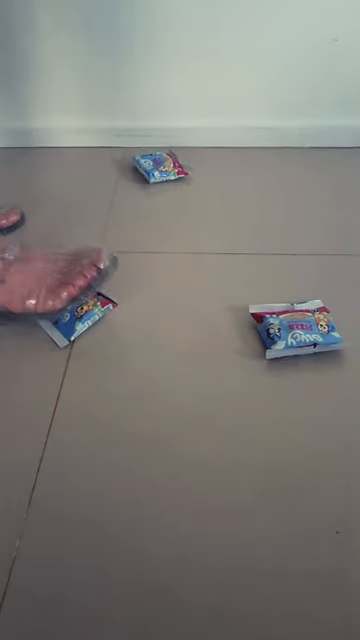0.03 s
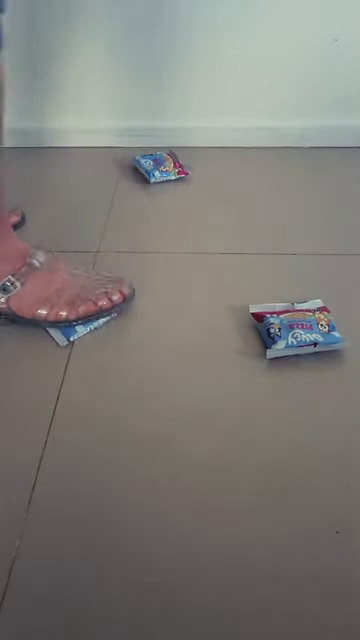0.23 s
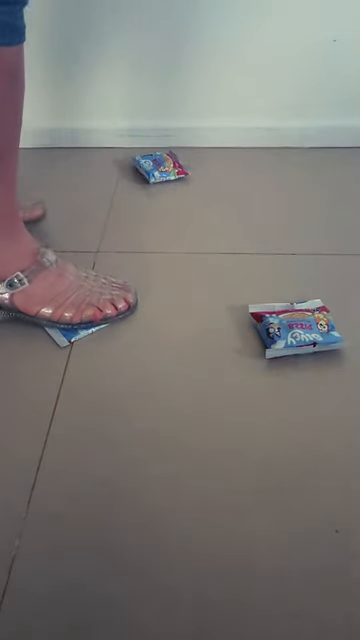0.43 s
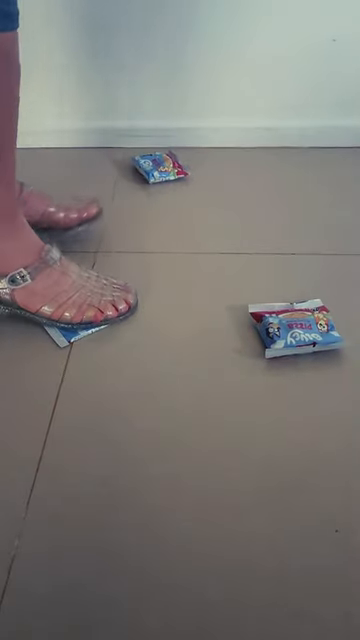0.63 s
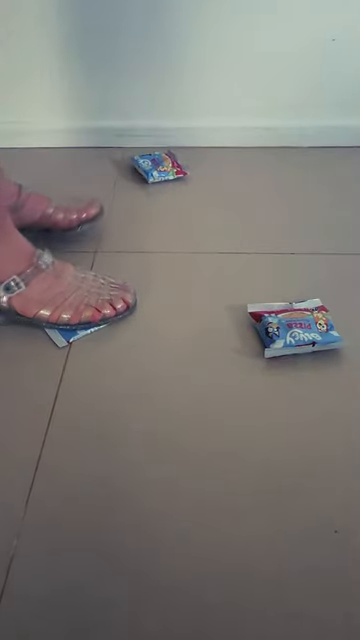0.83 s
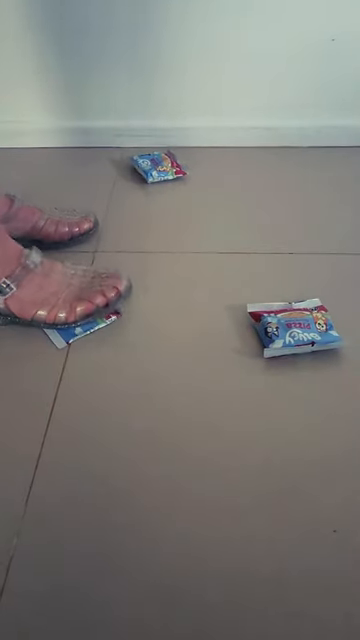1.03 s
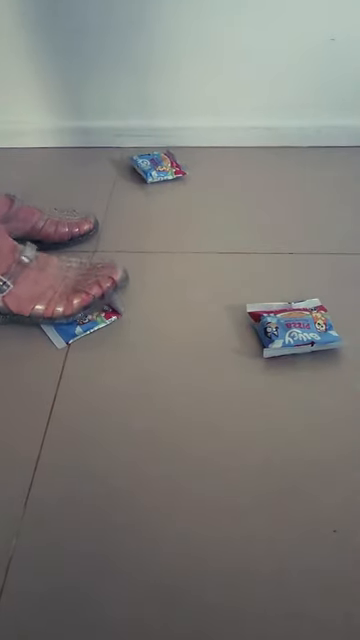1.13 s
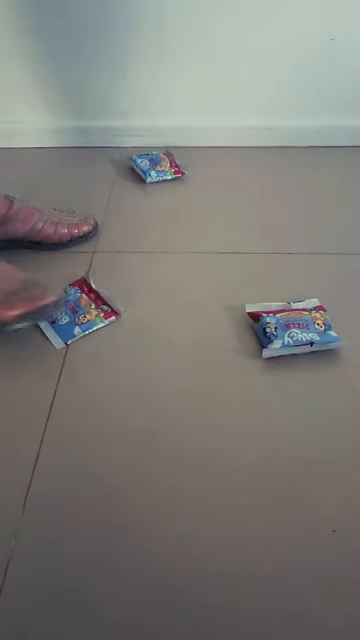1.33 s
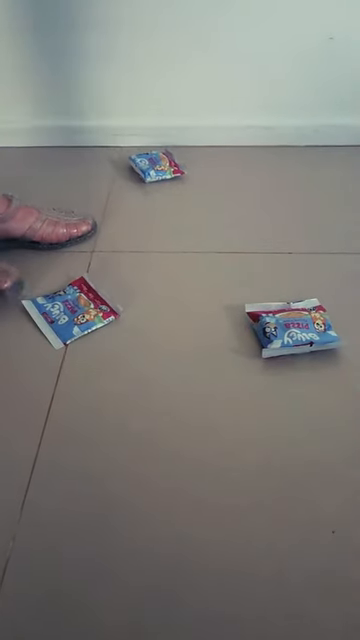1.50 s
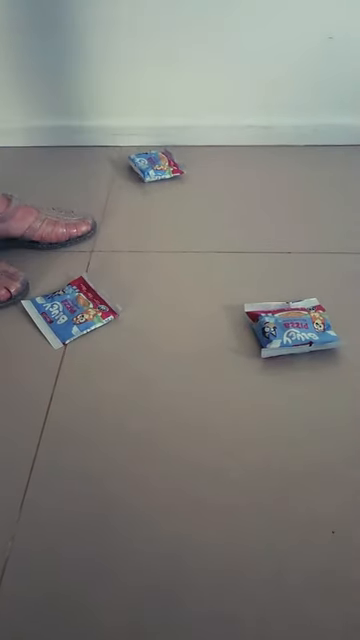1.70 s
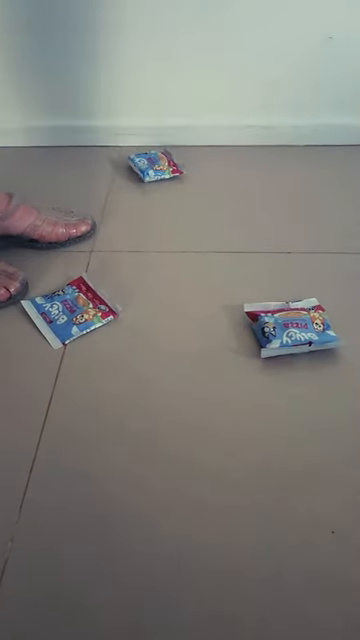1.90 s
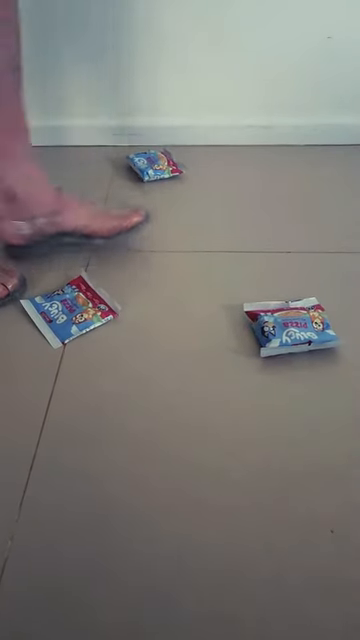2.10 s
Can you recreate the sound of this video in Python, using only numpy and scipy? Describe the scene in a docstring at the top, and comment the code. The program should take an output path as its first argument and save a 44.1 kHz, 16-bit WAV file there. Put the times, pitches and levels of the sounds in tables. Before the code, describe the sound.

A packet of crackers crunches loudly under a foot, then its wrapper crinkles and ticks.

```python
"""A bare, echoing room with a tiled floor. A sandalled foot stamps on a packet of crackers.
The bag crumples and the crackers snap and crumble as the sole thumps down; the room rings.
The foot lifts: crumbs shift, the bag pops dully, the sandal knocks once, and the wrapper crinkles and
springs back in single ticks. Then the sandal is set down lightly. Faint rumble and hiss lie underneath."""
import sys
import numpy as np
from scipy import signal
from scipy.fft import rfft, irfft
from scipy.io import wavfile

SR = 44100
rng = np.random.default_rng(int(sys.argv[2]) if len(sys.argv) > 2 else 0)


def master(y):
    """Save y as 16-bit WAV."""
    cut = np.clip(np.atleast_2d(y).T, -1, 1)
    pcm = np.round(cut * 32767)  # scale
    wavfile.write(sys.argv[1], SR, pcm.astype(np.int16))


N = 94815
T = np.arange(N) / SR
LANDING_S = 0.344

# wrapper creases flipping over, plus one bright cracker snap at 0.29 s: start_s, level_db, ring_hz
BRIGHT_TICKS = [(0.1729, -24.5, 4200), (0.2903, 1.5, 7500), (0.5368, -15.5, 9100), (0.6102, -15, 7440),
                (0.7582, -31.5, 7600), (0.8, -21, 4300), (.8182, -24, 8040), (.8930, -23, 7600),
                (0.911, -23, 7400), (0.9325, -9.5, 6760), (.9988, -13.5, 6000), (1.0588, -18.5, 5670),
                (1.1178, -20.5, 7500), (1.2679, -12.5, 7420), (1.2857, -23, 5600), (1.3305, -33.5, 8500),
                (1.4240, -16, 5980), (1.5794, -37, 4600), (1.8563, -46.5, 2170)]


def undb(db):
    """Decibels to gain."""
    return 10 ** (np.asarray(db) / 20)


def curve(rows):
    """Gain over time from (time_s, level_db) points."""
    return undb(np.interp(T, *np.array(rows).T, left=-120, right=-120))


def on_log(hz, points):
    """Interpolate (freq_hz, value) points on a log-frequency axis."""
    freq_hz, values = np.array(points).T
    return np.interp(np.log(hz + 1), np.log(freq_hz), values)


def unit(x):
    """Scale each channel to unit energy."""
    return x / np.sqrt(np.sum(x ** 2, axis=-1, keepdims=True))


def colour(x, points, size=4096):
    """Minimum-phase filter of unit energy through (freq_hz, gain_db) points."""
    gain = undb(on_log(np.fft.rfftfreq(size, 1 / SR), points))
    cepstrum = irfft(np.log(gain))
    cepstrum[1:size // 2] *= 2
    cepstrum[size // 2 + 1:] = 0
    impulse = unit(irfft(np.exp(rfft(cepstrum))))
    return signal.fftconvolve(x, impulse[None], axes=-1)[:, :x.shape[-1]]


def highpass(x, hz, order=2):
    """Butterworth low cut."""
    return signal.sosfilt(signal.butter(order, hz, "high", fs=SR, output="sos"), x)


def resonate(x, hz, width_hz):
    """One resonance, gain 1 at its centre."""
    return signal.lfilter(*signal.iirpeak(hz, hz / width_hz, fs=SR), x)


def stereo_noise(coherence, size):
    """Left and right noise with a common share."""
    noise = rng.standard_normal((3, size))
    return np.sqrt(coherence) * noise[0] + np.sqrt(1 - coherence) * noise[1:]


def pan(x, left_db):
    """Raise left over right by left_db."""
    return x * undb(np.array([[left_db], [-left_db]]) / 2)


def add(out, start_s, sound):
    """Mix a sound in at start_s."""
    i = int(start_s * SR)
    out[:, i:i + sound.shape[-1]] += sound[:, :N - i]


def crack(decay_ms, coherence, edge, size=3000):
    """A sharp release, then a quickly dying noise burst."""
    burst = unit(stereo_noise(coherence, size) * np.exp(-T[:size] * 1000 / decay_ms))
    burst[:, 0] += edge
    return unit(burst)


def grains(per_s, spread_db, decay_ms, coherence):
    """Tiny fractures of random time and size, in clumps; unit rms."""
    clumps_per_s, clump_db, kinds = 130, 5, 24
    out = np.zeros((2, N))
    chance, strength = rng.random(N), rng.standard_normal(N)
    clumps = np.interp(T * clumps_per_s, np.arange(N), rng.uniform(-0.45, 1, N))
    hits = (chance < per_s / SR) * undb(spread_db * np.minimum(strength, 2) + clump_db * clumps)
    kind = rng.integers(0, kinds, N)
    for k in range(kinds):
        grain = crack(decay_ms, coherence, edge=0.31, size=256)
        out += signal.oaconvolve((hits * (kind == k))[None], grain, axes=-1)[:, :N]
    return out / out.std()


def ringing_clicks(rows, tone, width_hz, ring_db, decay_ms, left_db):
    """Direct clicks, each ringing at its own pitch, and plain ones for the room."""
    direct, spread = np.zeros((2, 2, N))
    for start_s, level_db, ring_hz in rows:
        click = colour(crack(decay_ms, coherence=0.4, edge=0.68), tone)
        ring = undb(ring_db) * resonate(click, ring_hz, width_hz)
        add(direct, start_s, undb(level_db) * unit(click + ring))
        add(spread, start_s, undb(level_db) * np.ones((2, 1)))
    return pan(direct, left_db), colour(spread, tone)


def background():
    """Quiet rumble and hiss; a faint ring and hum die away at the start."""
    # air and ring spectra: freq_hz, gain_db
    air_tone = [(45, -15), (80, -6), (130, -17), (400, -26.5), (800, -29.5), (5800, -40), (7500, -31),
                (10000, -48.5), (15500, -41)]
    ring_tone = [(950, -15), (1500, -4.5), (2300, -7.5), (3800, -31)]
    # hum envelope: time_s, level_db
    hum_levels = [(0, -52.5), (.16, -58)]
    air_db, ring_db, fade_db_per_s, hum_hz = -68.5, -61, 100, 82
    air = undb(air_db) * colour(stereo_noise(0.471, N), air_tone)
    ring = undb(ring_db - fade_db_per_s * T) * colour(stereo_noise(0.18, N), ring_tone)
    hum = curve(hum_levels) * np.sin(2 * np.pi * hum_hz * T)
    return air + ring + hum


def bag_squash():
    """The air-filled bag crumples under the sole with a low, papery rumble."""
    # bag flattening: time_s, level_db
    levels = [(.166, -58.5), (.194, -37), (.216, -47), (.244, -26.5), (.300, -41), (.325, -65.5)]
    # bag spectrum: freq_hz, gain_db
    tone = [(35, -27), (90, -14.5), (230, 0.5), (480, -11), (950, -7), (4000, -31)]
    crumple = grains(per_s=1500, spread_db=2.6, decay_ms=0.79, coherence=0.81)
    return colour(crumple * curve(levels), tone)


def crackers():
    """Big snaps over dense crumbling that follows the foot's weight; all ring with one hollow note."""
    # crumbling under the sole: time_s, level_db
    crush = [(.168, -86), (.176, -45), (.194, -36), (.220, -38.5), (.230, -27.5), (.252, -20.5),
             (.278, -20), (.305, -27.5), (.338, -37.5), (.351, -21.5), (.372, -23), (.395, -30),
             (.45, -49.5), (.85, -68)]
    # crackers breaking: start_s, level_db, decay_ms
    snaps = [(.2432, 4, 1.8), (.2490, 2, 2.2), (.2592, 2, .9), (.2682, 8, 1.8), (.3184, 6, 1.0),
             (.3263, 8.5, 1.0), (.3287, 2, 1.0), (.3556, 10, 1.6), (.3665, 2, 2.5), (.3735, 0, 2.2)]
    # cracker spectrum: freq_hz, gain_db
    tone = [(100, -37.5), (400, -12.5), (850, -7), (1150, -11.5), (1550, -4.5), (2200, -3), (2900, -8.5),
            (4200, -5), (5200, -9), (7500, -5.5), (9900, -15), (11800, -9), (15500, -14.5)]
    out = grains(per_s=4500, spread_db=6.5, decay_ms=0.53, coherence=0.36) * curve(crush)
    for start_s, level_db, decay_ms in snaps:
        snap = crack(decay_ms, coherence=0.47, edge=0.39)
        cutoff_hz = 1900 / decay_ms ** 2  # briefer snaps are thinner
        add(out, start_s, undb(level_db) * highpass(snap, cutoff_hz))
    ring = undb(-2) * resonate(out, hz=2190, width_hz=220)
    return pan(colour(out + ring, tone), left_db=0.97)


def wrapper_ticks():
    """Single creases of film flip over with bright ticks; one bright cracker snap at 0.29 s is played the same
    way."""
    # tick spectrum: freq_hz, gain_db
    tone = [(900, -20), (2200, -11), (3700, -13), (5300, 2), (8000, -2), (9800, -3.5), (15500, -9)]
    return ringing_clicks(BRIGHT_TICKS, tone, width_hz=1000, ring_db=10, decay_ms=1.0, left_db=-1.5)


def sole_thumps():
    """Low thuds of the sole that swell and die in a few cycles."""
    # sole meeting the floor: start_s, peak_db, pitch_hz, half_rise_ms
    thumps = [(0.253, -31, 94.4, 11.4), (0.347, -35.5, 89, 7.5), (0.343, -34, 183.3, 6.3),
              (.347, -35, 279.8, 4.6), (0.682, -45, 86.4, 3.7), (0.955, -50, 63, 7.8)]
    out = np.zeros((2, N))
    for start_s, peak_db, pitch_hz, half_rise_ms in thumps:
        age = T * 1000 / (2 * half_rise_ms)
        envelope = undb(peak_db) * (age * np.exp(1 - age)) ** 3
        add(out, start_s, (envelope * np.sin(2 * np.pi * pitch_hz * T))[None])
    return out


def standing_waves():
    """The full weight landing leaves low standing waves and a beating cluster of high room notes."""
    # room modes: pitch_hz, level_db
    modes = [(86, -45), (291, -42), (2110, -37), (2162, -32), (2250, -38)]
    rise_s, t60_s = 0.012, 0.55
    age_s = np.maximum(T - LANDING_S, 0)
    envelope = (1 - np.exp(-age_s / rise_s)) * undb(-60 * age_s / t60_s)
    phases = rng.uniform(0, np.pi / 2, (len(modes), 2, 1))
    return envelope * sum(undb(level_db) * np.sin(2 * np.pi * pitch_hz * age_s + phase)
                          for (pitch_hz, level_db), phase in zip(modes, phases))


def sandal_steps():
    """The soft plastic sandal pats and scuffs the tiles."""
    # pats and scuffs: start_s, level_db, decay_ms
    steps = [(.3470, -3, 15), (1.3480, -35, 3.1), (1.5966, -21.5, 1.01), (1.6200, -29.5, 17.3)]
    # sandal spectrum: freq_hz, gain_db
    tone = [(60, -10), (150, -3.5), (300, 3), (450, -6), (900, -5.5), (2100, 0.5), (2800, -5), (4000, -8.5),
            (7300, -11), (15500, -34.5)]
    out = np.zeros((2, N))
    for start_s, level_db, decay_ms in steps:
        age = T[:SR // 4] * 1000 / decay_ms
        scuff = stereo_noise(0.45, len(age)) * np.sqrt(age) * np.exp(-age)
        add(out, start_s, undb(level_db) * unit(scuff))
    return colour(out, tone)


def pops_and_knock():
    """Dull pops of the bag, and one low knock of the sandal, as the weight shifts."""
    # bag pops and the sandal knock (450 Hz): start_s, level_db, ring_hz
    hits = [(.5362, -18, 1050), (.6068, -24, 780), (.6314, -27, 1400), (.6885, -27, 450), (.874, -26, 1700),
            (.8925, -21, 1400), (.9248, -13, 1480), (.9843, -13.5, 1150), (1.0345, -22, 900),
            (1.1875, -23, 1040)]
    # their spectrum: freq_hz, gain_db
    tone = [(80, -18), (400, -9), (900, 3), (1800, -3.5), (3000, -18.5), (15500, -22.5)]
    return ringing_clicks(hits, tone, width_hz=400, ring_db=7, decay_ms=3.4, left_db=1.0)


def film_settling():
    """After the landing, each tick leaves the film crackling briefly, thin and airy."""
    gain_db, fade_s = -37, 0.035
    envelope = sum(undb(level_db) * (T > start_s) * np.exp(-np.abs(T - start_s) / fade_s)
                   for start_s, level_db, _ in BRIGHT_TICKS if start_s > LANDING_S)
    crackle = grains(per_s=910, spread_db=1, decay_ms=0.45, coherence=0.36)
    return undb(gain_db) * envelope * highpass(crackle, hz=10500)


def wrapper_crinkle():
    """Many small creases let go as the foot lifts."""
    # wrapper unfolding: time_s, level_db
    levels = [(.84, -60), (.90, -48.5), (.93, -38.5), (.965, -50), (1.08, -44.5), (1.14, -57),
              (1.18, -47.5), (1.245, -59.5), (1.38, -100), (1.422, -48.5), (1.44, -83)]
    # film spectrum: freq_hz, gain_db
    tone = [(80, -13), (250, -1), (500, -7), (1000, 0.5), (1500, 2.5), (3000, -2), (5600, -1.5), (7500, -2),
            (9800, -11), (12000, -5.5), (15500, -11.5)]
    creases = grains(per_s=910, spread_db=1, decay_ms=0.63, coherence=0.18)
    return pan(colour(creases * curve(levels), tone), left_db=-0.35)


def room(x):
    """Hard walls return a dense tail whose bass lasts longest."""
    # room decay: freq_hz, t60_s
    decay = [(80, 2.35), (250, 0.77), (2200, 0.6167), (7500, 0.4754), (15000, 0.55)]
    # tail spectrum: freq_hz, gain_db
    tone = [(60, -20.5), (300, -1.5), (1800, -0.5), (2150, 0), (2700, 1.5), (7500, 0.5), (10000, -4.5),
            (15500, -3)]
    gap_s, crossfeed = 0.00092, 0.091
    freq_hz = np.fft.rfftfreq(N, 1 / SR)
    spectrum = rfft(stereo_noise(0.1, N))
    edges_hz = np.r_[0, np.geomspace(110, SR / 2, 15)]
    tail = np.zeros((2, N))
    for low_hz, high_hz in zip(edges_hz, edges_hz[1:]):
        band = irfft(spectrum * ((freq_hz >= low_hz) & (freq_hz < high_hz)), N)
        t60_s = on_log((low_hz + high_hz) / 2, decay)
        tail += band * undb(-60 * T / t60_s)
    onset = np.clip(T / gap_s - 1, 0, 1)
    tail = unit(colour(tail * onset, tone))
    return signal.fftconvolve(x + crossfeed * x[::-1], tail, axes=-1)[:, :N] / 1.258


def scene():
    """Packet and sandal, direct and by way of the room, over the background."""
    ticks, ticks_spread = wrapper_ticks()
    dull_hits, dull_spread = pops_and_knock()
    # sound, send_db
    sources = [(crackers(), -3), (bag_squash(), -10), (wrapper_crinkle() + film_settling(), -3.5),
               (sandal_steps(), -0.5), (sole_thumps(), -9)]
    room_only = [(ticks_spread, -7.5), (dull_spread, -10)]
    direct = ticks + dull_hits + sum(sound for sound, _ in sources)
    sent = sum(undb(send_db) * sound for sound, send_db in sources + room_only)
    return direct + room(sent) + standing_waves() + background()


def record(dry):
    """Two close mic ports share the bass and ring in the treble; peaks round off, the top is cut."""
    ring_left_db, ring_right_db, ceiling, top_hz = -9.5, 4.5, 0.75, 15800
    side = highpass((dry[0] - dry[1]) / 2, hz=260, order=1)
    ports = dry.mean(axis=0) + np.array([side, -side])
    ring = undb([[ring_left_db], [ring_right_db]]) * resonate(ports, hz=7760, width_hz=1000)
    rounded = ceiling * np.tanh((ports + ring) / ceiling)
    return signal.sosfilt(signal.ellip(12, 0.1, 90, top_hz, fs=SR, output="sos"), rounded)


dry = scene()
out = record(dry)
master(out)
```